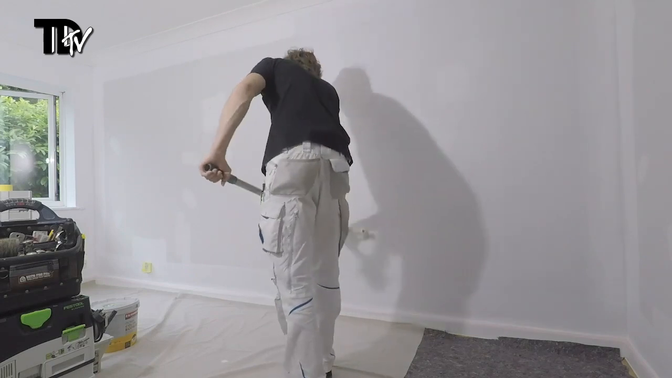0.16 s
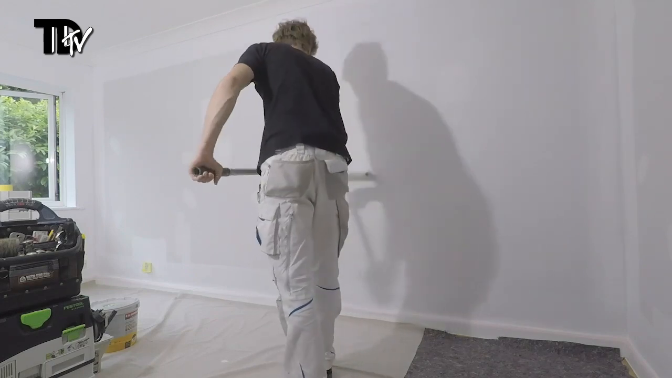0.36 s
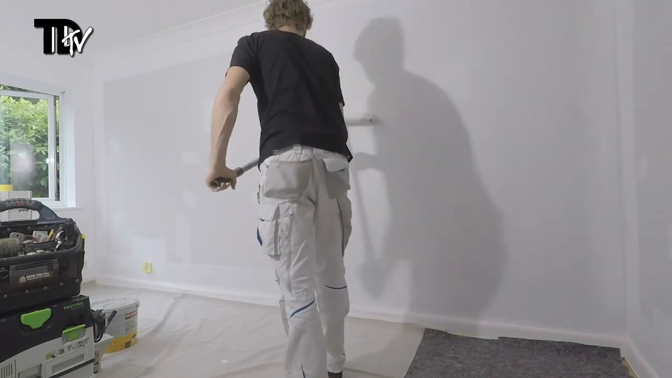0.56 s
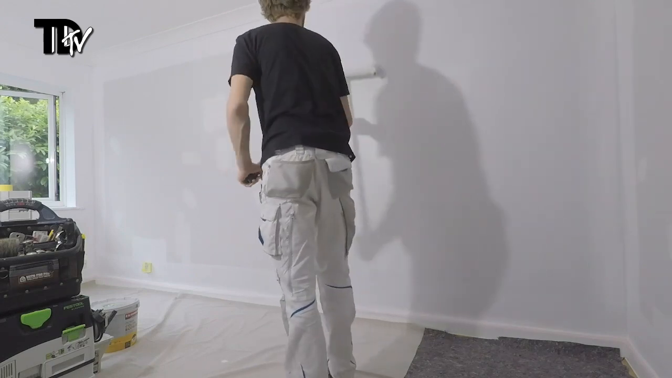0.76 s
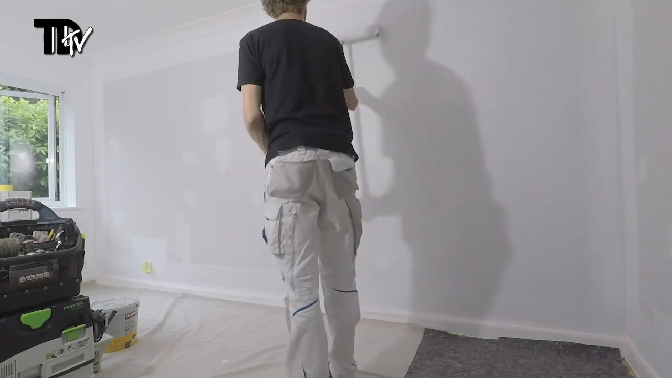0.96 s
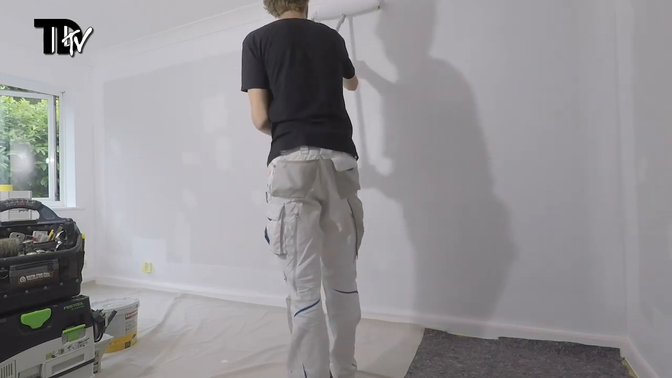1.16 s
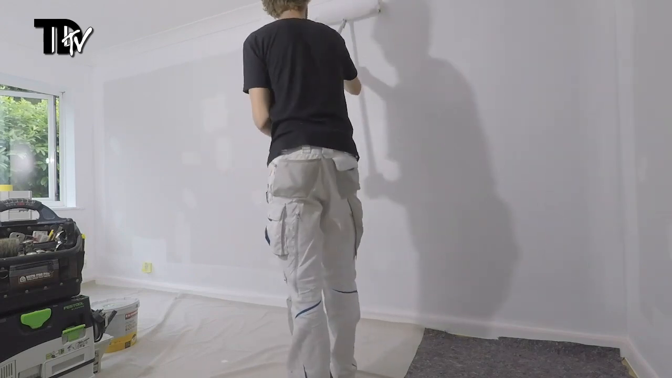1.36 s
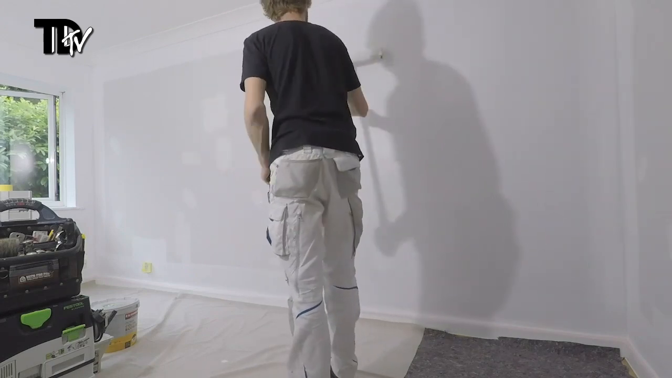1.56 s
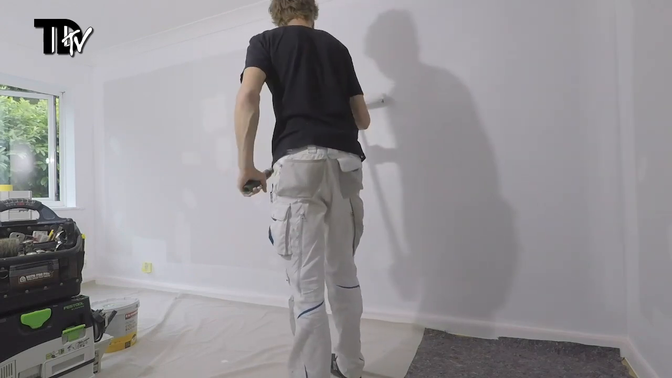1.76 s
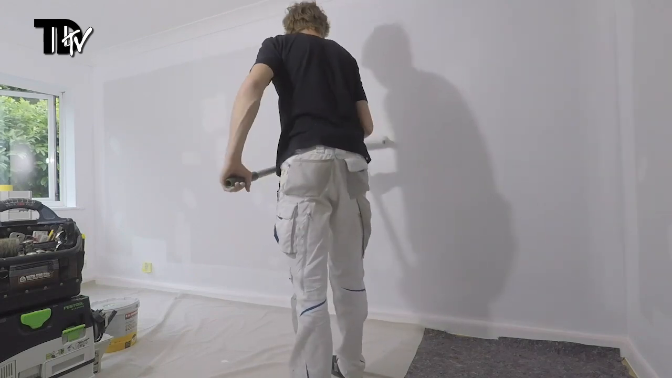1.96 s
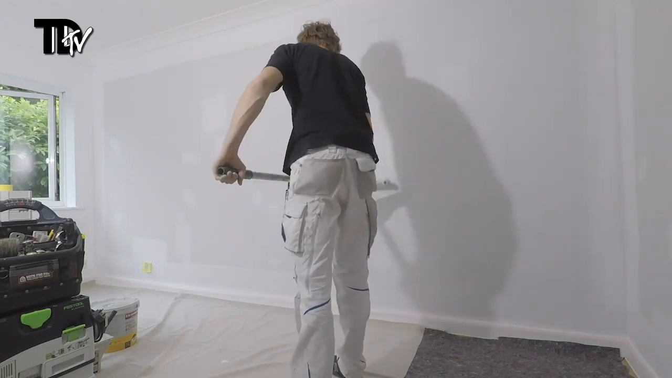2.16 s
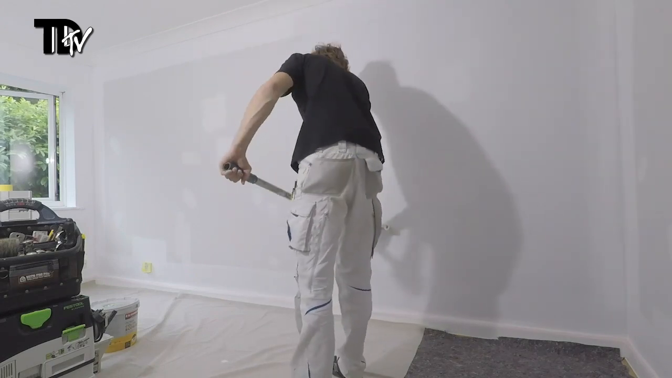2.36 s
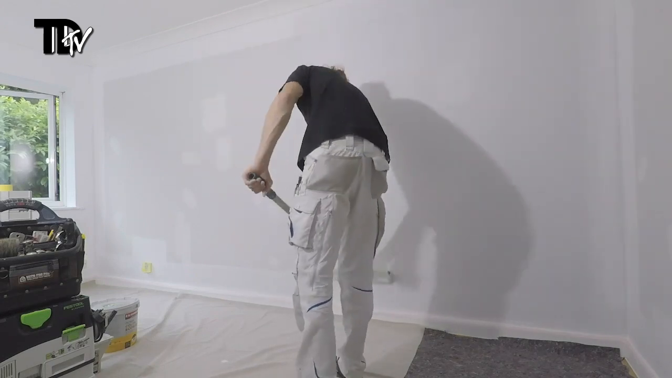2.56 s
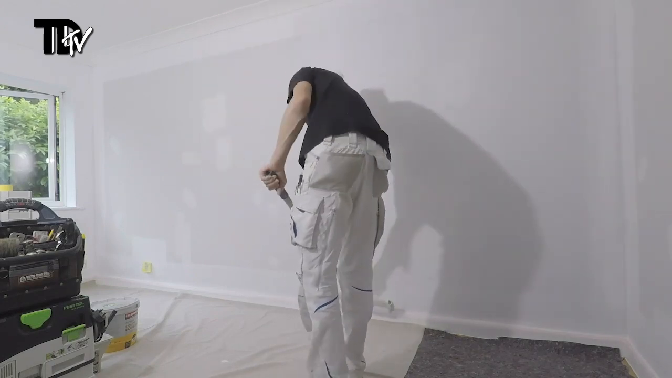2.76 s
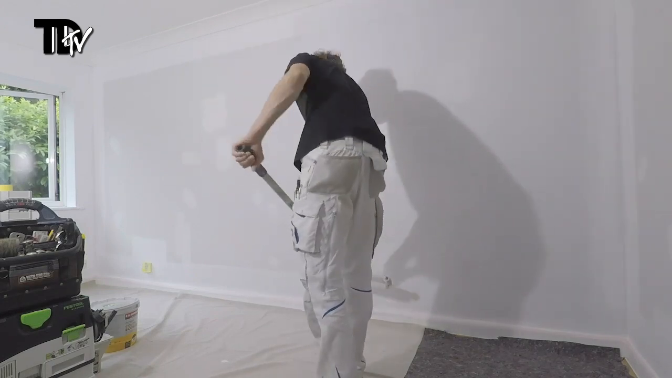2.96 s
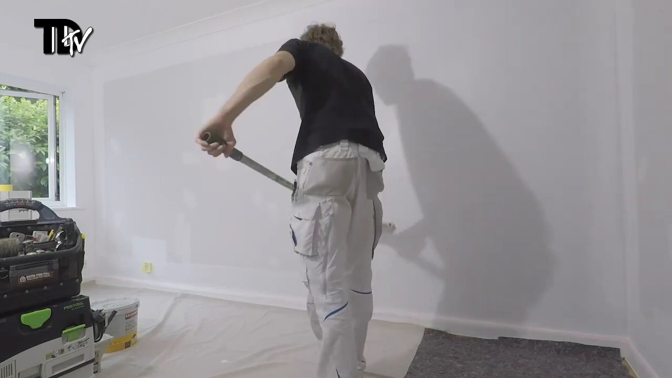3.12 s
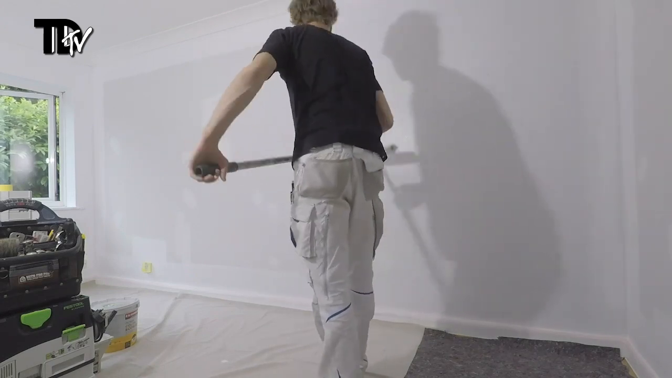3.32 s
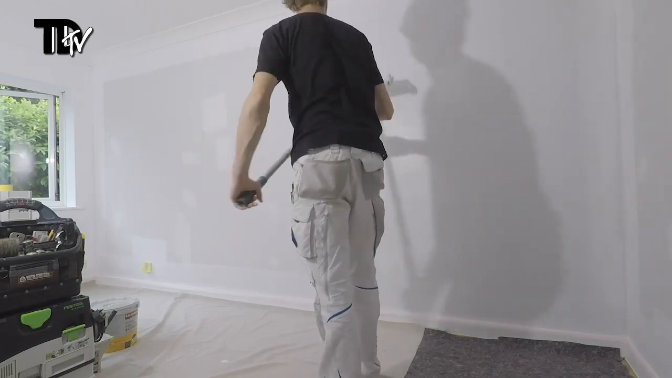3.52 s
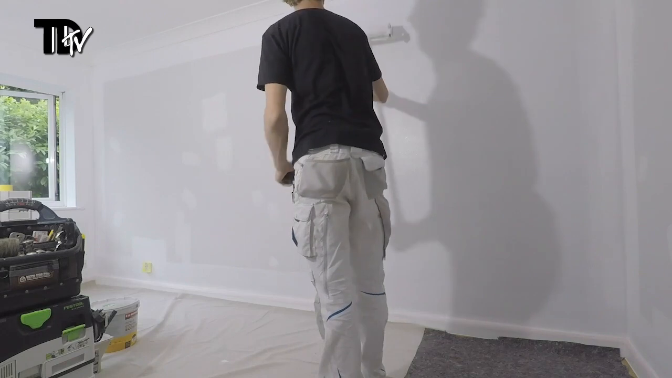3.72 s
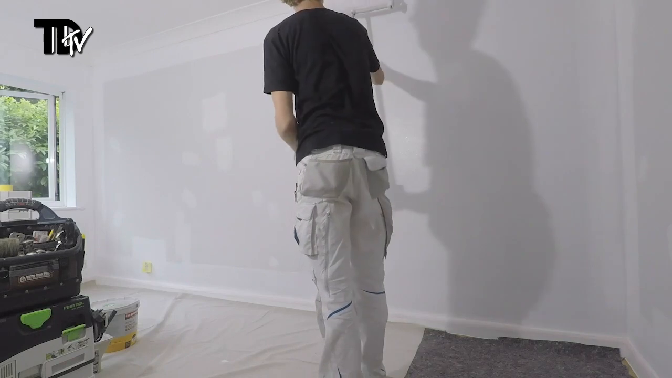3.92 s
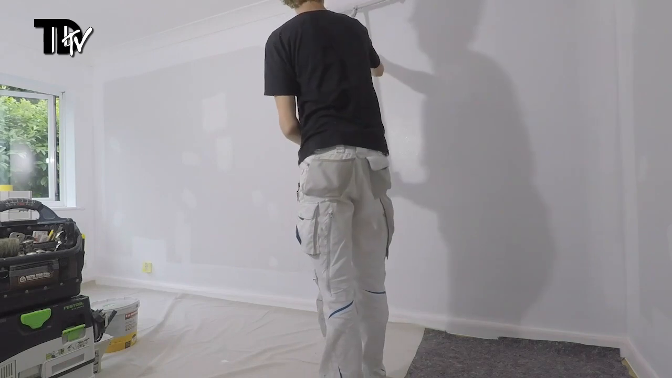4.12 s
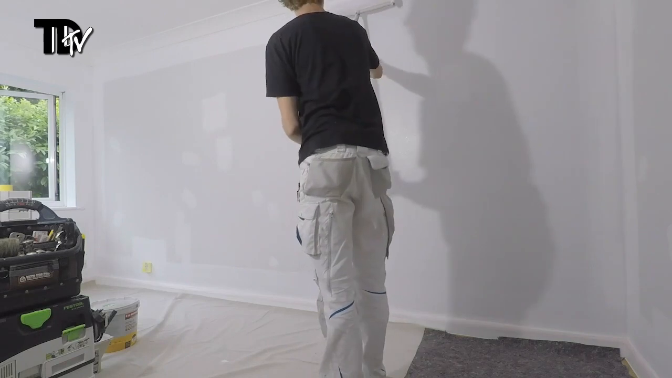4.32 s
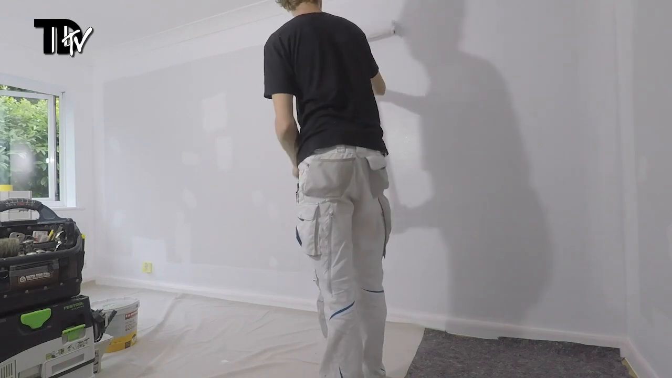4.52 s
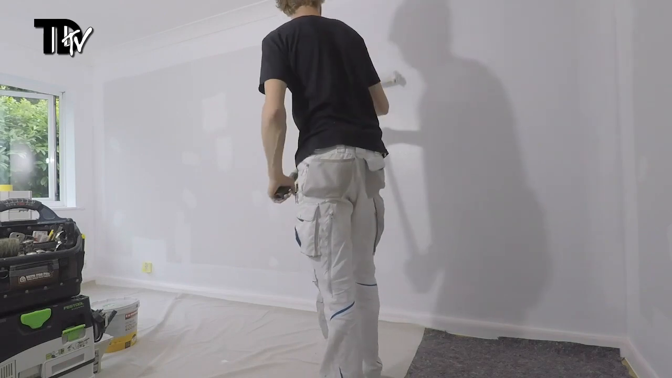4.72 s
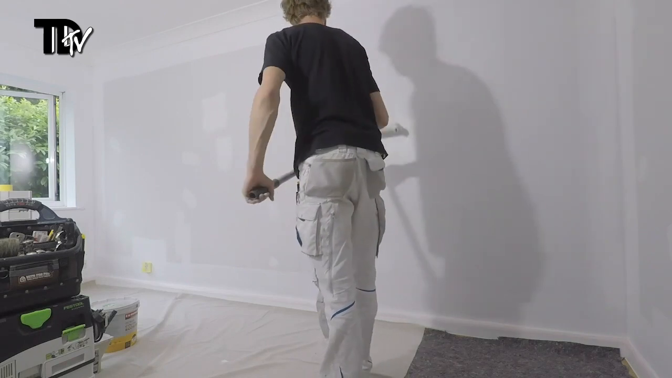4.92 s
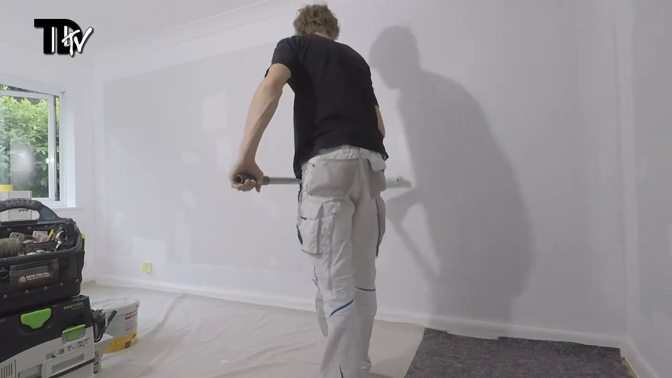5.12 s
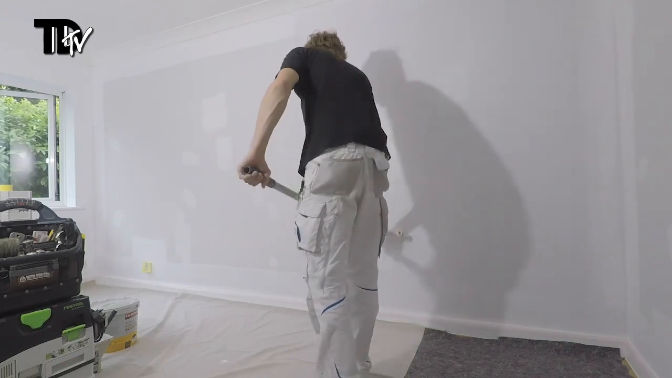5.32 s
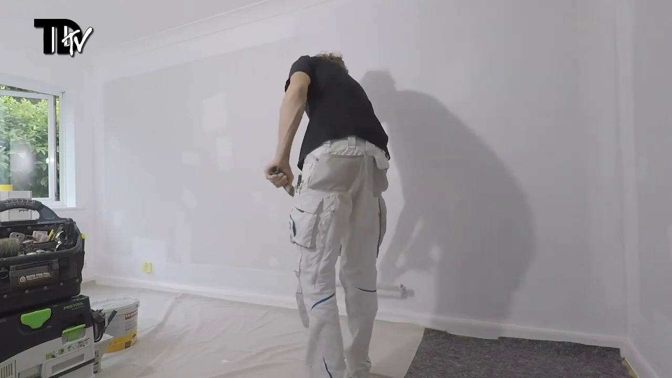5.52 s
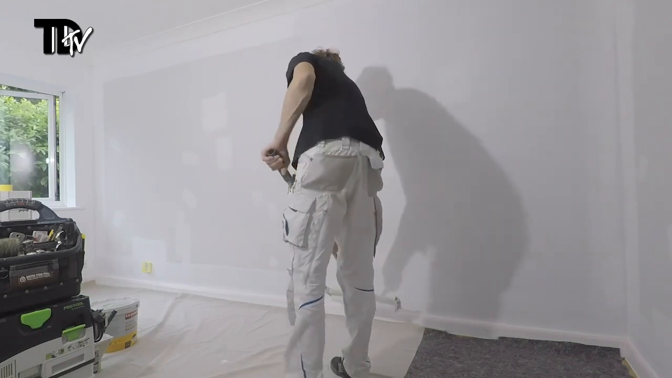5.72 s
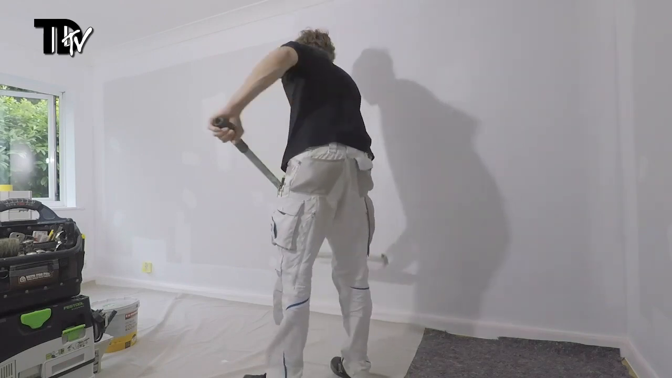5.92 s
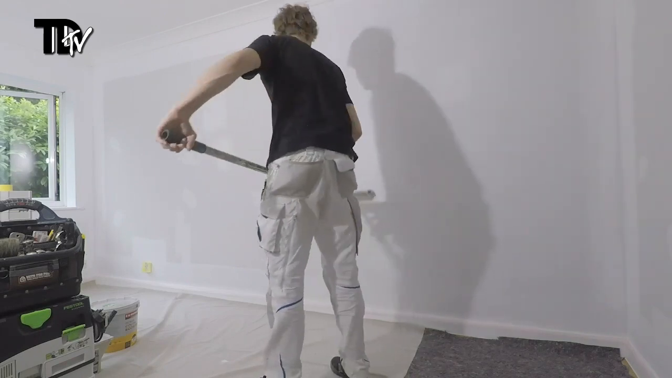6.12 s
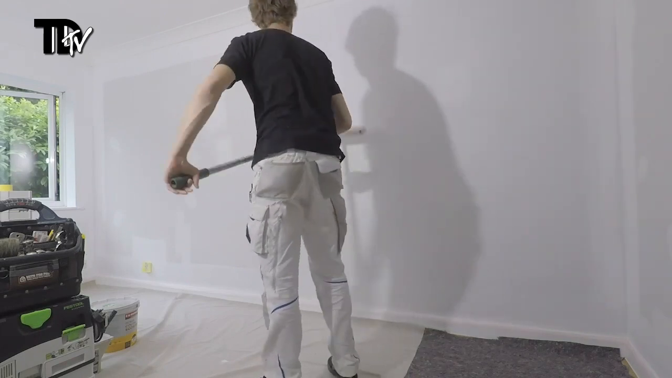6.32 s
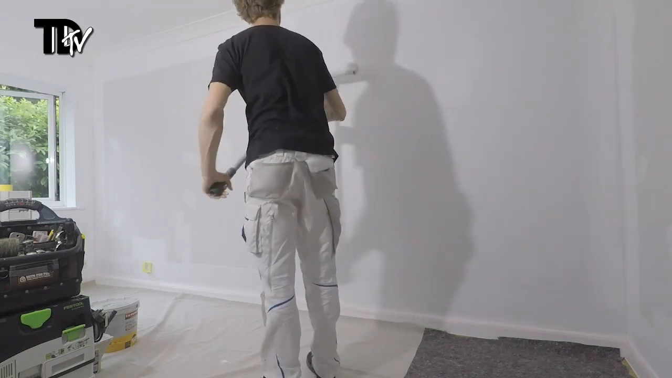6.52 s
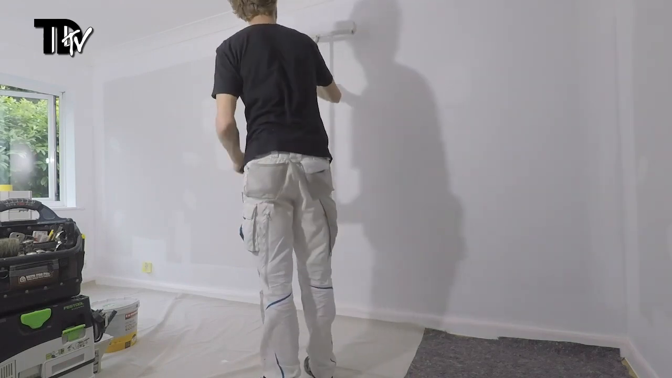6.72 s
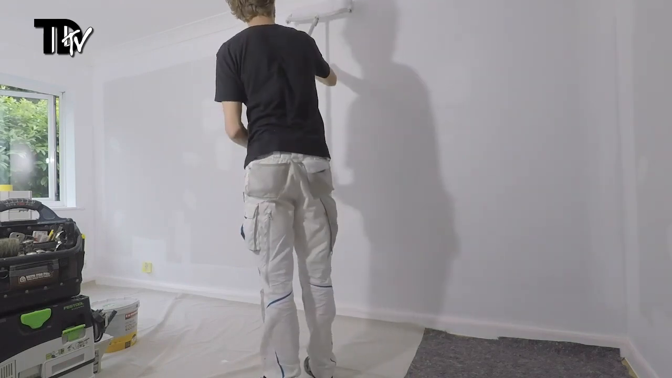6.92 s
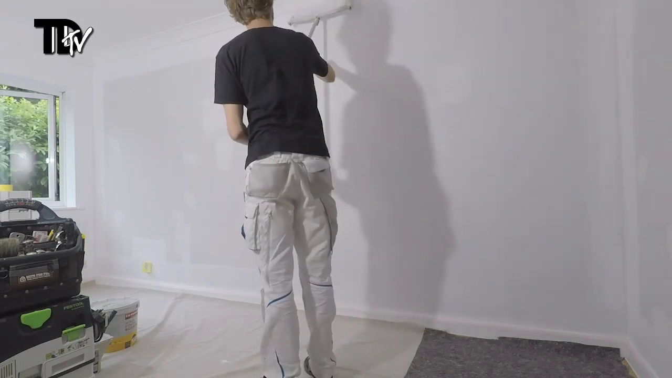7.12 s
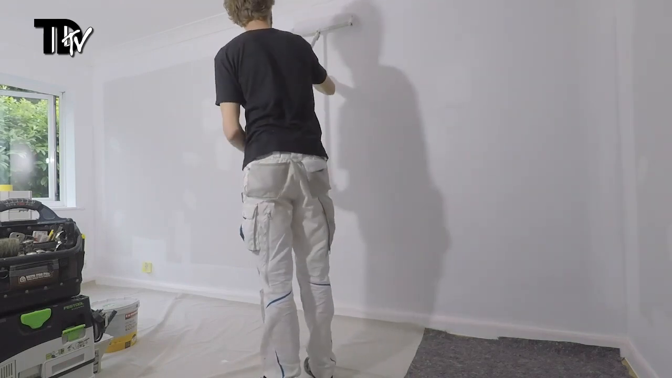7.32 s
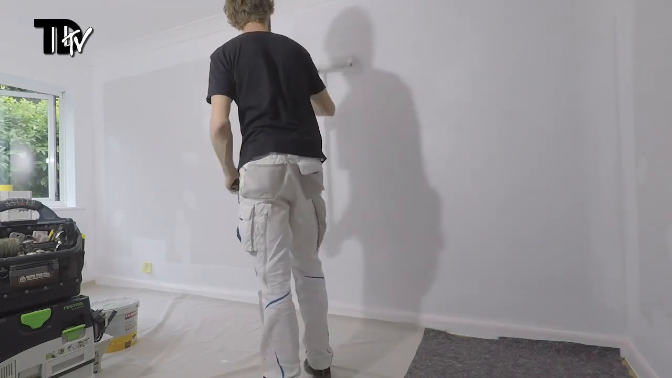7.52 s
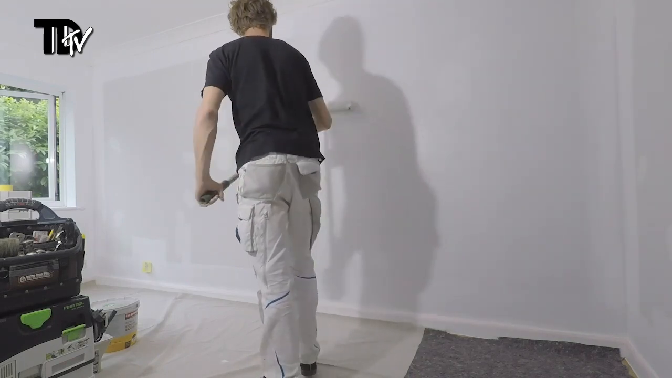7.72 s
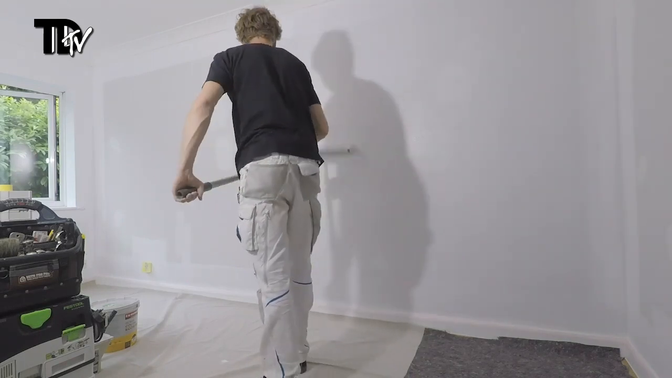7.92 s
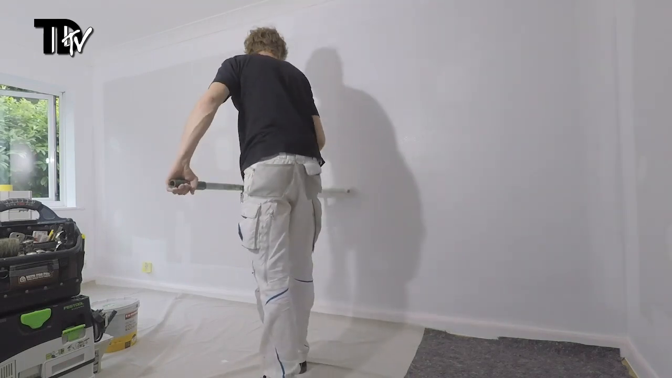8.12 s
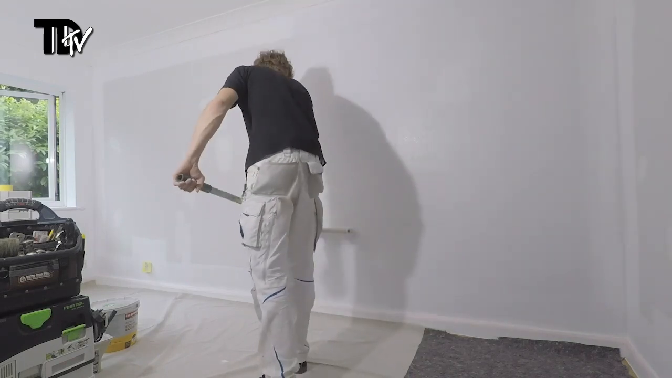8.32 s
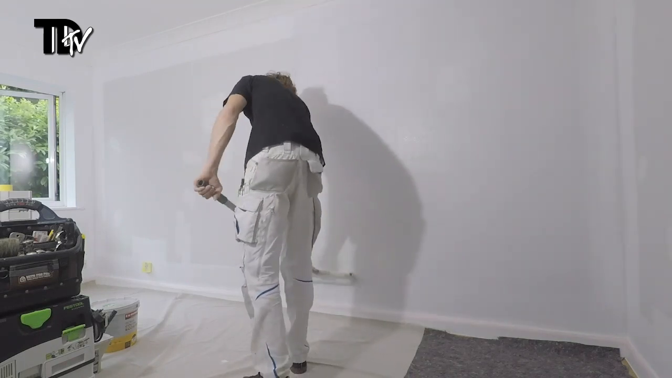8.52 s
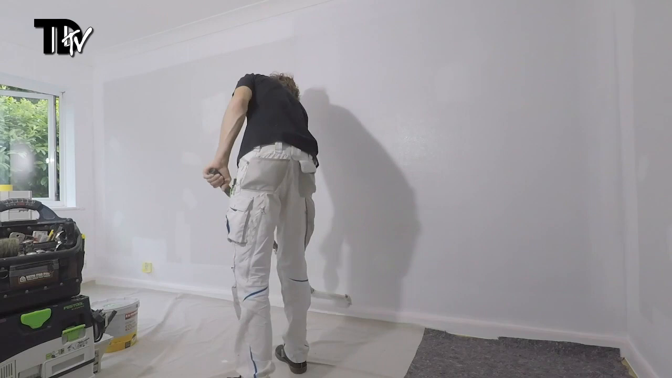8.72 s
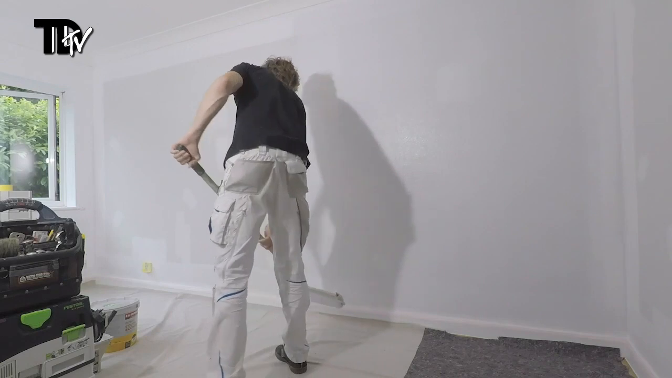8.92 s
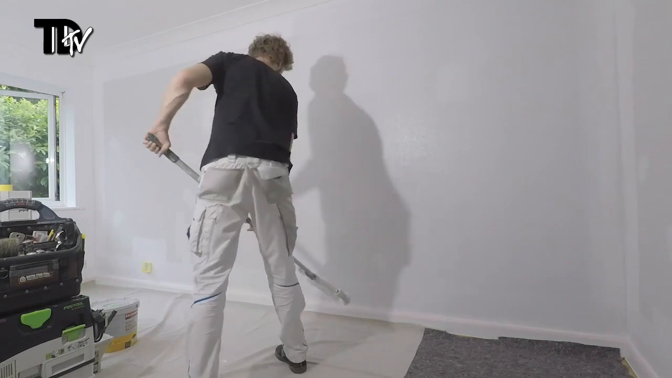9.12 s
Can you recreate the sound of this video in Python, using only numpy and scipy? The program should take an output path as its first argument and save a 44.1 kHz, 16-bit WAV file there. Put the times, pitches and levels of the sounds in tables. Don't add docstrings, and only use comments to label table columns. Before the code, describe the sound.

A painter works indoors: the roller's dense, wet crackle swells and eases with each stroke, pauses, then returns. Thumps and gritty rubs on a sheeted floor fill the gaps, with a sharp sticky tick before the third stroke builds. After a last steady stroke, a pole knocks down and rings briefly. Soft window air, low rumbles and a quick faint pulse on the left stay underneath, heard from a few metres away.

```python
import sys
import numpy as np
from scipy import signal
from scipy.fft import rfft, irfft, next_fast_len
from scipy.io import wavfile
from scipy.ndimage import uniform_filter1d

SR = 44100
rng = np.random.default_rng(int(sys.argv[2]) if len(sys.argv) > 2 else 0)


def wrap_up_sound(samples):
    columns = np.atleast_2d(samples).T
    tamed = np.clip(columns, -1, 1)
    steps = np.round(tamed * 32767).astype(np.int16)
    wavfile.write(sys.argv[1], SR, steps)


def magnitude_from_level(level_db):
    exponent = np.asarray(level_db, float) / 20
    return 10 ** exponent


N = 408353


def rms_one(x):
    return x / np.sqrt(np.mean(x ** 2) + 1e-20)


def at_hz(points, hz):
    table_hz, values = np.array(points).T
    return np.interp(np.log(hz), np.log(table_hz), values)


def colour(x, spectrum):
    size = next_fast_len(N)
    hz = np.maximum(np.arange(size // 2 + 1) * SR / size, 1)
    shaped = rfft(x, size) * magnitude_from_level(at_hz(spectrum, hz))
    return rms_one(irfft(shaped, size)[:N])


def drift(rate_hz):
    r = np.exp(-80 * np.pi * rate_hz / SR)
    draws = rng.standard_normal(N // 40 + 2002)
    slow = signal.lfilter([1], [1, -2 * r, r * r], draws)[2000:]
    return np.interp(np.arange(N) / 40, np.arange(len(slow)), rms_one(slow))


def ring(clicks, hz, t60):
    r, w = magnitude_from_level(-60 / (t60 * SR)), 2 * np.pi * hz / SR
    return signal.lfilter([0, np.sin(w)], [1, -2 * r * np.cos(w), r * r], clicks + 1e-18)


def narrow_noise(modes):
    out = 0
    for hz, width_hz, level_db in modes:
        t60 = 2.2 / width_hz
        once = ring(rng.standard_normal(N), hz, t60)
        twice = rms_one(ring(once, hz, t60))
        swell = np.sqrt(uniform_filter1d(twice ** 2, size=SR // 8) + .05)
        out = out + magnitude_from_level(level_db) * twice / swell
    return out


def snaps(per_s, spread_db, cycles):
    sizes = magnitude_from_level(spread_db * np.minimum(rng.exponential(1, N), 5)) * rng.choice([-1, 1], N)
    born = rng.random(N) < per_s / SR
    dealt = rng.integers(0, 20, N)
    out = np.zeros(N)
    for k, hz in enumerate(np.geomspace(900, 17000, 20)):
        out += np.sqrt(hz) * rms_one(ring(sizes * born * (dealt == k), hz, cycles / hz))
    return out


# t/s, level/dB
STROKES = [
    [(0.0, -23.5), (0.12, -20), (0.21, -19), (0.45, -18), (0.65, -19), (0.8, -20), (1.1, -23),
     (1.228, -25.5), (1.265, -34)],
    [(1.338, -34), (1.384, -24), (1.43, -18.5), (1.6, -19), (2.008, -21), (2.17, -20.5), (2.43, -24),
     (2.71, -19), (2.73, -43)],
    [(4.335, -46), (4.345, -32), (4.37, -34), (4.5, -23), (4.647, -18), (5.015, -19), (5.375, -21),
     (5.571, -19), (5.63, -29.5)],
    [(7.19, -35.5), (7.22, -36), (7.27, -36), (7.332, -25.5), (7.468, -21), (7.594, -18.5), (7.696, -19.5),
     (8.622, -19.5), (8.66, -28)],
]
# f/Hz, level/dB per Hz
PEEL_COLOUR = [(530, -15.5), (900, -16), (1160, -11), (1240, -15), (1740, -9.5), (2200, -8), (3550, -3.5),
               (4620, -2.5), (6300, 0), (8900, -1.5), (10800, -7.5), (13800, -12), (15600, -15.5)]
# f/Hz, level/dB per Hz
WALL_COLOUR = [(82, -42), (140, -1.5), (193, -2), (273, -7.5), (356, -3.5), (565, -1.5), (753, 3.5),
               (1250, -1.5), (2200, -10), (2860, -5), (4840, -120)]
CRUISE_DB = -20
SPRAY_DB, SPRAY_FOLLOWS = -28, 1.16
SPRAY_THINS_DB_PER_S = 1.1
DRONE_DB, DRONE_FOLLOWS = -34.5, 0.83


def roller():
    t = np.arange(N) / SR
    gains = np.zeros((3, N))
    for stroke in STROKES:
        s, db = np.transpose(stroke)
        touch = np.clip(np.minimum(t - s[0] + 0.0031, s[-1] - t + 0.012) / 0.0022, 0, 1)
        swing_db = np.interp(t, s, db) - CRUISE_DB
        thinned_db = SPRAY_THINS_DB_PER_S * (t - s[0]).clip(0, 2)
        spray_db = SPRAY_DB + SPRAY_FOLLOWS * swing_db - thinned_db
        drone_db = DRONE_DB + DRONE_FOLLOWS * swing_db
        gains += touch * magnitude_from_level([CRUISE_DB + swing_db, spray_db, drone_db])
    peel_gain, spray_gain, drone_gain = gains

    threads = colour(snaps(9000., spread_db=2.5, cycles=6.2), PEEL_COLOUR)
    size = next_fast_len(N)
    is_spray = np.fft.rfftfreq(size, 1 / SR) > 9500
    spray = irfft(rfft(threads, size) * is_spray, size)[:N]
    peel = peel_gain * rms_one(threads - spray) * magnitude_from_level(.3 * drift(6.1))
    spray = spray_gain * rms_one(spray) * magnitude_from_level(0.32 * drift(20))
    nap = magnitude_from_level(0.5 * drift(42) + 1.0 * drift(50))
    drone = drone_gain * colour(rng.standard_normal(N), WALL_COLOUR) * magnitude_from_level(1.56 * drift(14))
    return magnitude_from_level(-4.5) * (nap * (peel + spray) + drone)


# f/Hz, width/Hz, level/dB
SHUDDER_MODES = [
    [(40.3, 26, 0)],
    [(62.6, 13, -2), (80.1, 7.6, 3.5)],
    [(113.3, 17, 2)],
    [(194, 15, 0)],
]
# t/s, level/dB, length/s
LEANS = [(.5, -35.5, 0.38), (1.1, -45, 0.65), (1.7, -47, 0.55), (2.4, -44, 0.74), (4.36, -48, 0.27),
         (5.0, -38.5, 0.66), (5.75, -44, 0.75), (7.45, -48, 0.85), (7.896, -37.5, 0.45), (8.42, -43, 0.34),
         (9.18, -44, 0.24)]
# t/s, level/dB, length/s
SHIFTS = [(.4, -43.5, 0.44), (.85, -49, .3), (1.3, -55, .5), (1.75, -53, 0.2), (2.05, -46, 0.33),
          (3.14, -44, .25), (3.4, -55, 0.23), (3.762, -43, .2), (3.95, -56, .2), (5.077, -45.5, 0.36),
          (5.46, -43, 0.12), (8.0, -56, 0.41), (8.383, -58, .3), (9.25, -46, 0.21)]
# t/s, level/dB, length/s
FLEXES = [(.5, -48, 0.46), (.8, -45.5, 0.3), (1.706, -40.5, 0.26), (2.6, -48.5, 0.5), (4.874, -42, 0.34),
          (5.128, -49, .2), (5.55, -57, 0.28), (6.7, -53, 0.24), (7.822, -43.5, 0.39), (8.055, -47, 0.12),
          (8.6, -59, .3), (9.17, -43, 0.09)]
# t/s, level/dB, length/s
FRAME_HUMS = [(.55, -44.5, 0.4), (1.198, -43, 0.082), (1.7, -51, .5), (2.63, -48.5, 0.5),
              (4.633, -45, 0.14), (5.106, -45, 0.39), (5.59, -47.5, 0.21), (7.7, -59, 0.67),
              (8.653, -44, 0.12)]
REST_DB = (-49.5, -54.5, -61.5, -67)


def shudder():
    out, t = np.zeros(N), np.arange(N) / SR
    for modes, swells, rest_db in zip(SHUDDER_MODES, (LEANS, SHIFTS, FLEXES, FRAME_HUMS), REST_DB):
        gain = np.full(N, magnitude_from_level(rest_db))
        for s, db, length in swells:
            gain += magnitude_from_level(db) * np.exp(-(2 * (t - s) / length) ** 2)
        out += gain * rms_one(narrow_noise(modes))
    return out


# f/Hz, level/dB per Hz
AIR_COLOUR = [(59, -31), (100, -6), (228, -6.5), (448, -6.5), (566, -9), (603, -10), (980, -9.5),
              (1770, -16.5), (2050, -16.5), (2190, -17.5), (15600, -28)]
# f/Hz, width/Hz, level/dB
HOUSE_HUM = [(200.4, 17, -63.5), (296.4, 5.7, -59.5), (346, 8.1, -61.5)]
AIR_DB = -47


def window_air():
    gusts = magnitude_from_level(AIR_DB + 0.31 * drift(1) + 1.04 * drift(5.2))
    return gusts * colour(rng.standard_normal(N), AIR_COLOUR) + narrow_noise(HOUSE_HUM)


# f/Hz, t60/s
ROOM_T60 = [(60, 0.24), (300, 1), (1000, 0.67), (4000, 0.5), (10000, 0.41), (16000, 0.16)]
ROOM_DB = 2.5


def room(x):
    frame = dict(nperseg=512, noverlap=384)
    hz, _, direct = signal.stft(x, SR, **frame)
    _, _, diffuse = signal.stft(rng.standard_normal(N), SR, **frame)
    t60 = np.maximum(at_hz(ROOM_T60, hz + 1), .05)
    keep = magnitude_from_level(-120 * 128 / SR / t60)
    energy = np.array([signal.lfilter([0, 0, 0, 1 - k], [1, -k], abs(row) ** 2)
                       for k, row in zip(keep, direct)])
    diffuse *= np.sqrt(energy / np.mean(abs(diffuse) ** 2))
    return x + magnitude_from_level(ROOM_DB) * signal.istft(diffuse, SR, **frame)[1][:N]


PULSE_FIRST_S, PULSE_PERIOD_S, PULSE_HALF_S, PULSE_DB = .0069, .1024, 0.002, -36
CHATTER_FIRST_S, CHATTER_PERIOD_S, CHATTER_DB = .317, .5553, -51.5


def interference():
    t = np.arange(N) / SR
    half_period = PULSE_PERIOD_S / 2
    since = (t - PULSE_FIRST_S + half_period) % PULSE_PERIOD_S - half_period
    hump = np.clip(1 - abs(since) / PULSE_HALF_S, 0, 1)
    hump += 0.21 * (abs(since + .0004) < .0014) + 0.71 * (abs(since - .0003) < .00006)
    busy = (t - CHATTER_FIRST_S) % CHATTER_PERIOD_S < .05
    spikes = busy * (rng.random(N) < 500. / SR) * rng.standard_normal(N)
    spikes = signal.lfilter([1], [1, -.75], spikes)
    coupling = signal.butter(1, 40, "high", fs=SR, output="sos")
    return signal.sosfilt(coupling, magnitude_from_level(PULSE_DB) * hump + magnitude_from_level(CHATTER_DB + 6.5) * spikes)


# t/s, peak level/dB, length/s, centre f/Hz, width/octaves
PUFFS = [(2.991, -32.5, 0.15, 302, 1.1), (2.994, -45.5, .1, 3020, 2.9), (3.296, -47, 0.046, 4000, 2.1),
         (3.654, -44, 0.13, 4940, 1.6), (3.658, -41, .18, 250, 1.3), (3.659, -41.5, 0.12, 1800, 1.6),
         (3.822, -41, .06, 1676, 1.1), (3.848, -45, 0.09, 1300, 0.58), (4.318, -43, .05, 3000, 1.7),
         (4.333, -33, 0.12, 1300, 1.7), (6.25, -42.5, 0.061, 5500, 1.7), (6.679, -46, 0.085, 230, 1.3),
         (7.167, -46, .05, 4000, 1.8), (7.18, -37, .08, 1300, 1.4), (9.135, -46.5, 0.36, 3500, 2.1),
         (9.15, -35, 0.18, 150, 0.62), (9.139, -27, .25, 400, 1.2), (7.242, -39, .1, 1520, 2.2),
         (4.34, -43, 0.13, 400, 1.5)]
# t/s, peak level/dB, length/s, centre f/Hz
SCUFFS = [(3.386, -46, 0.23, 3880), (5.971, -42, 0.19, 4280), (6.04, -52, .2, 1200),
          (6.061, -50, 0.17, 400), (6.266, -45, 0.13, 3500), (6.295, -49, 0.13, 2300), (6.1, -45, .12, 200),
          (6.576, -48, 0.2, 1290), (6.597, -44.5, 0.16, 3540), (6.63, -41, 0.1, 300),
          (7.228, -31.5, 0.042, 970)]
SCUFF_RISE_SHARE, SCUFF_OCTAVES = .14, 1.84
PUFF_RISE_S = 0.0057


def scuffs():
    out, t = np.zeros(N), np.arange(SR // 2) / SR
    rows = [(*r, SCUFF_RISE_SHARE * r[2], SCUFF_OCTAVES) for r in SCUFFS]
    rows += [(*r[:4], PUFF_RISE_S, r[4]) for r in PUFFS]
    for s, peak_db, t60, hz, rise, octaves in rows:
        edges = np.clip(hz * 2. ** (np.array([-.5, .5]) * octaves), 30, .45 * SR)
        catches_db = 2.1 * np.repeat(rng.standard_normal(len(t) // 150), 150)
        grains_db = 0.88 * rng.standard_normal(len(t))
        grit = rng.standard_normal(len(t)) * magnitude_from_level(catches_db + grains_db)
        band = signal.butter(2, edges, "band", fs=SR, output="sos")
        rub = rms_one(signal.sosfilt(band, grit))
        swell = np.minimum(t / max(rise, .001), 1)
        fall = magnitude_from_level(peak_db - 60 * np.maximum(t - rise, 0) / max(t60, .01))
        at = round(s * SR)
        out[at:at + len(t)] += (rub * swell * fall)[:N - at]
    return out


def blows(hits, modes):
    out, half_s = np.zeros(N), SR // 2
    click = -1. * (np.arange(half_s) == 0)
    strengths_db = rng.normal(0, 2.2, (len(hits), len(modes)))
    for (s, peak_db, bright_hz), strength_db in zip(hits, strengths_db):
        at = round(s * SR)
        for (hz, level_db, t60), db in zip(modes, strength_db):
            soft = 1 / (1 + (hz / bright_hz) ** 2)
            gain = soft * magnitude_from_level(peak_db + level_db + db - 15)
            out[at:at + half_s] += gain * ring(click, hz, t60)[:N - at]
    return out


# t/s, peak level/dB, brightness f/Hz
THUMPS = [
    (2.992, -30, 900),
    (3.659, -32, 800),
    (3.668, -25.5, 695),
    (4.037, -38, 500),
    (6.03, -30.5, 400),
    (6.1, -50, 400),
    (6.678, -26.5, 300),
    (6.7, -34, 300),
]
# f/Hz, level/dB, t60/s
BOARD_MODES = [(84.2, -2.5, 1.8), (150, 6, 0.22), (202, -4, 0.11), (276, 5, 0.16), (334, 7, 0.18),
               (384, 12, 0.031), (505, -13, 0.081), (651, -10, 0.037), (800, -22, .05), (920, -8, 0.056),
               (1308, -12, .04)]


def thumps():
    return blows(THUMPS, BOARD_MODES)


# t/s, peak level/dB, f/Hz
TICKS = [(3.824, -35, 1700), (4.3343, -30, 1260), (4.342, -27, 7500), (4.5396, -10, 7400),
         (6.578, -39, 1400), (7.194, -21, 8000), (7.2323, -27.5, 1150), (7.234, -28, 7000),
         (7.301, -22, 6800), (7.36, -16, 8300), (9.1405, -37, 3500), (9.152, -26, 8600), (9.181, -25, 8700)]


def ticks():
    out = np.zeros(N)
    click = np.arange(900) == 0
    for s, peak_db, hz in TICKS:
        at = round(s * SR)
        out[at:at + 900] += magnitude_from_level(peak_db + 1.5) * ring(click, hz, 23.0 / hz)[:N - at]
    return out


# t/s, peak level/dB, brightness f/Hz
KNOCKS = [
    (9.1395, -12.5, 1500),
    (9.155, -28, 900),
    (9.167, -31, 900),
    (9.179, -34, 1210),
]
# f/Hz, level/dB, t60/s
POLE_MODES = [(290, -9, .3), (344, -8, .35), (412, 10.5, 0.079), (514, -8, .12), (660, 4, .06),
              (810, 1, 0.086), (920, 6, 0.071), (1140, -6, .06), (1308, -14, .03)]


def pole_knocks():
    no_bass = signal.butter(2, 170, "high", fs=SR, output="sos")
    return signal.sosfilt(no_bass, blows(KNOCKS, POLE_MODES))


def scene():
    struck, tick = thumps() + pole_knocks(), ticks()
    echoing = room(roller() + scuffs() + .5 * tick + 0.56 * struck)
    mono = echoing + .5 * tick + 0.11 * struck + shudder() + window_air()
    bass_limit = signal.butter(6, 35, "high", fs=SR, output="sos")
    mono = signal.sosfilt(bass_limit, mono)
    return np.array([mono, mono])


# t/s, centre f/Hz
PARTINGS = [(.39, 5750), (.392, 9800), (.462, 13200), (.487, 6600), (.509, 14500), (.644, 5170),
            (.649, 12400), (.925, 11750), (1.533, 9600), (1.534, 5200), (1.947, 8700), (1.95, 11050),
            (1.95, 13750), (2.039, 5800), (2.043, 7600), (5.407, 7550), (5.409, 9600), (7.497, 13100),
            (8.125, 11700), (8.588, 13750), (8.589, 5800), (8.589, 10000)]
PARTING_WIDTH_HZ, PARTING_DB = 1100, -1


def partings(mono):
    side, window = np.zeros(N), np.sin(np.pi * np.arange(2048) / 2048) ** 2
    for s, hz in PARTINGS:
        at = round(s * SR) - 1024
        unlike = mono[at:at + 2048][::-1]
        edges = [hz - PARTING_WIDTH_HZ / 2, hz + PARTING_WIDTH_HZ / 2]
        band = signal.butter(6, edges, "band", fs=SR, output="sos")
        side[at:at + 2048] += magnitude_from_level(PARTING_DB) * window * signal.sosfilt(band, unlike)
    return side


def low_pass(x):
    return signal.sosfilt(signal.butter(12, 15750, fs=SR, output="sos"), x)


def record(dry):
    side = partings(dry[0])
    wired = dry + [side + interference(), -side]
    rounded = .56 * np.tanh(wired / .56)
    top_cut = signal.ellip(12, .5, 60, 15340, fs=SR, output="sos")
    return low_pass(signal.sosfilt(top_cut, rounded))


dry = scene()
out = record(dry)
wrap_up_sound(out)
```